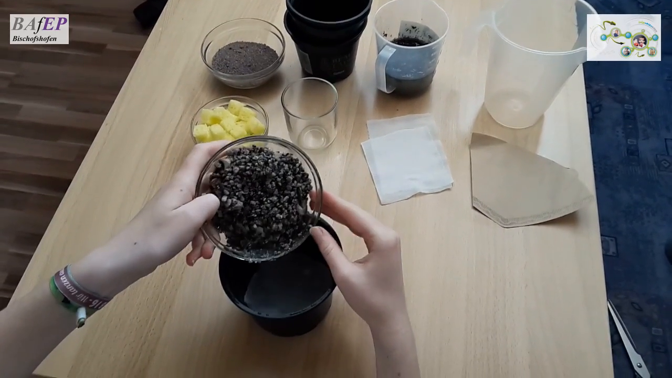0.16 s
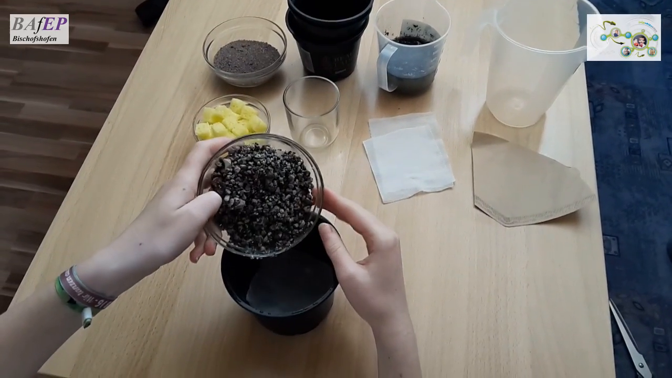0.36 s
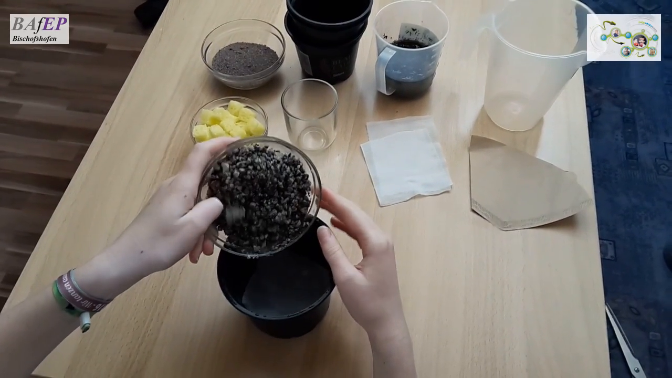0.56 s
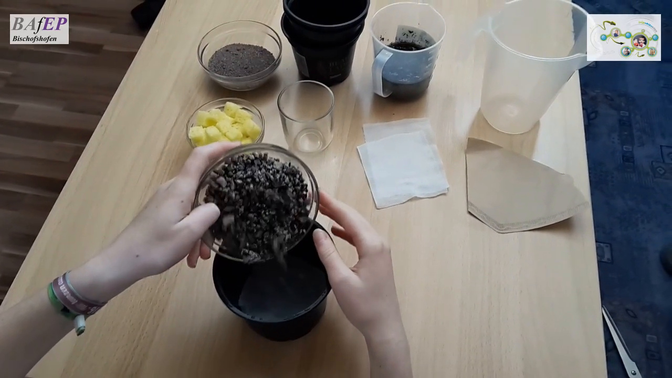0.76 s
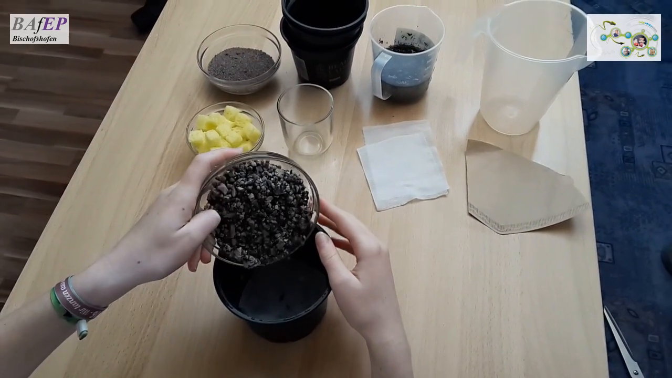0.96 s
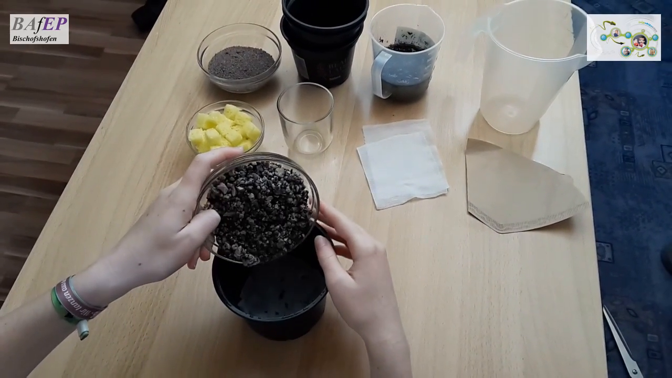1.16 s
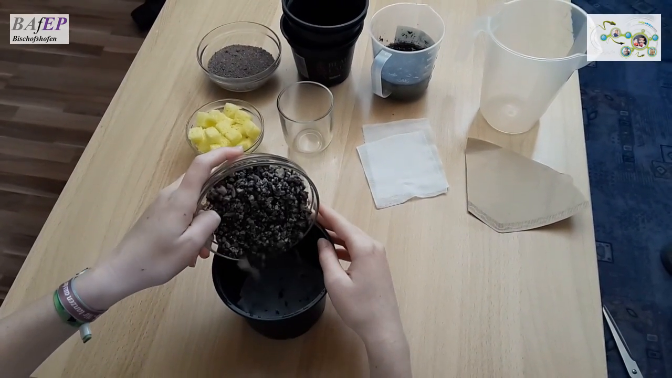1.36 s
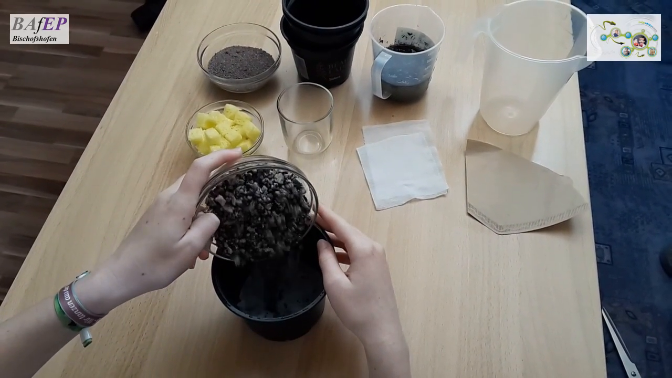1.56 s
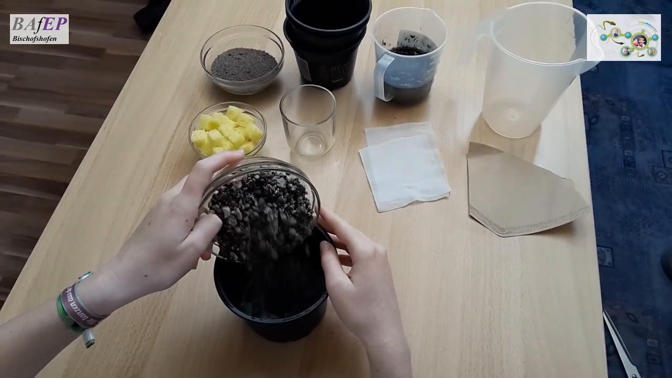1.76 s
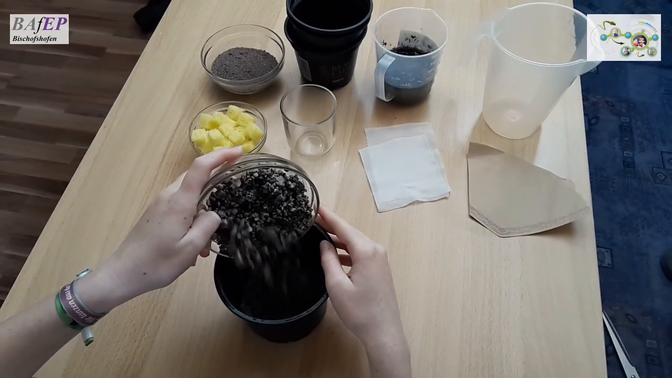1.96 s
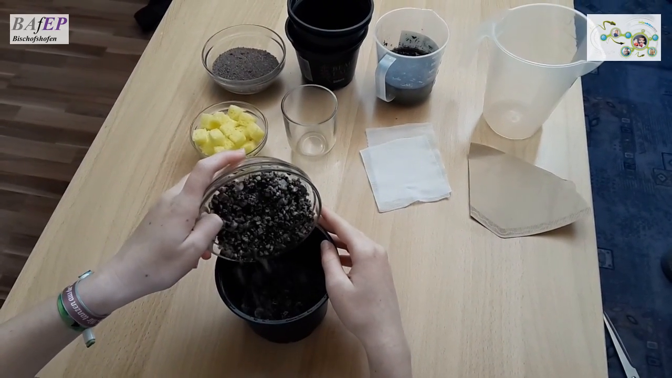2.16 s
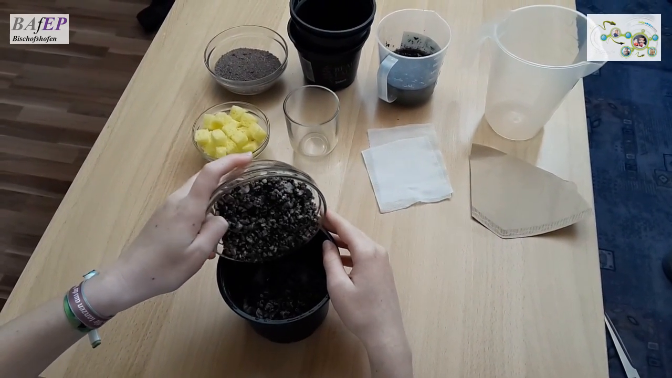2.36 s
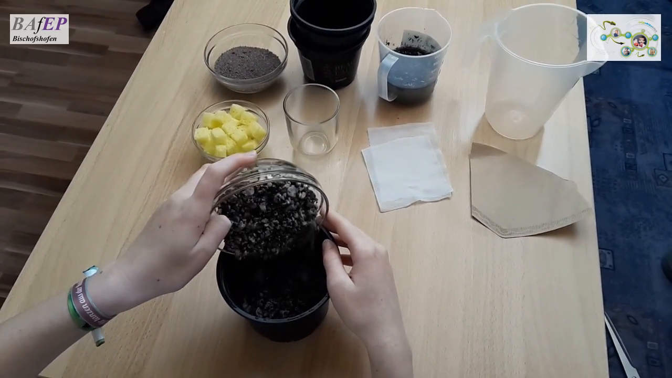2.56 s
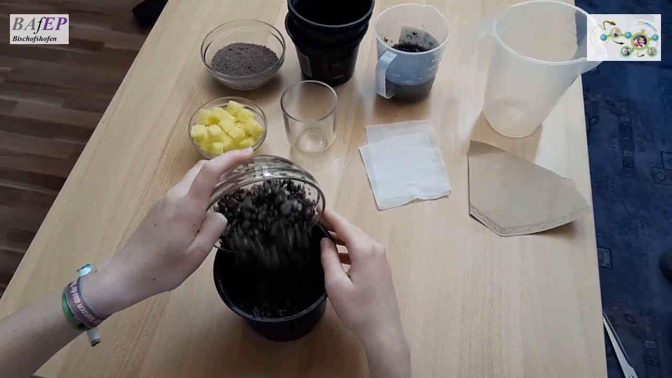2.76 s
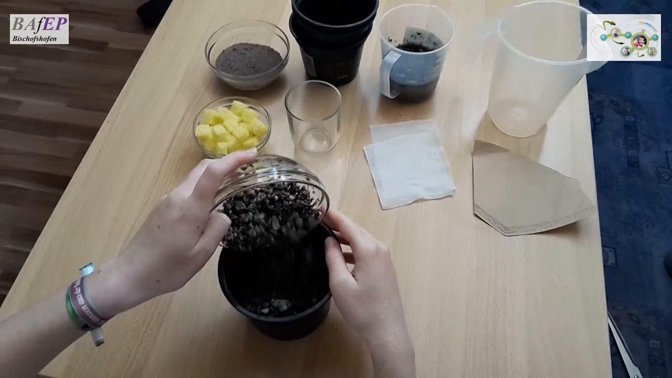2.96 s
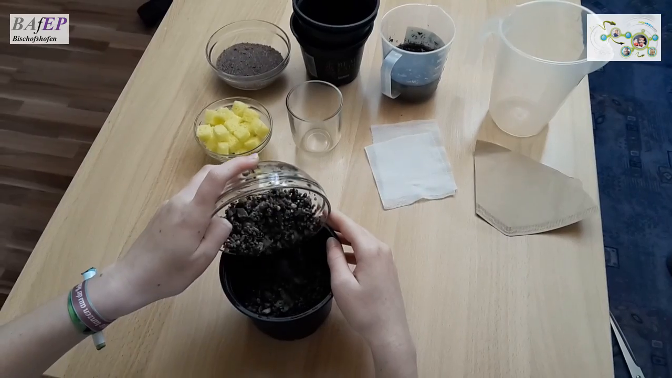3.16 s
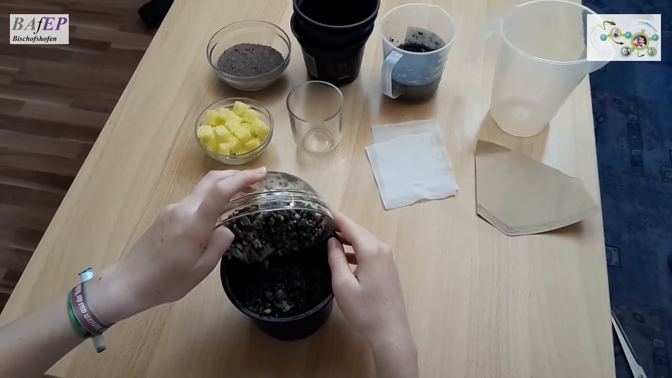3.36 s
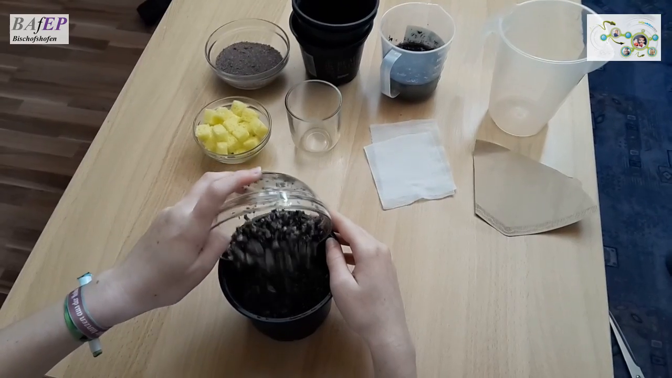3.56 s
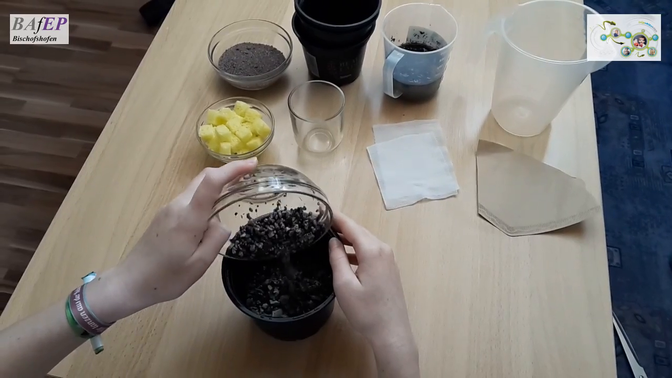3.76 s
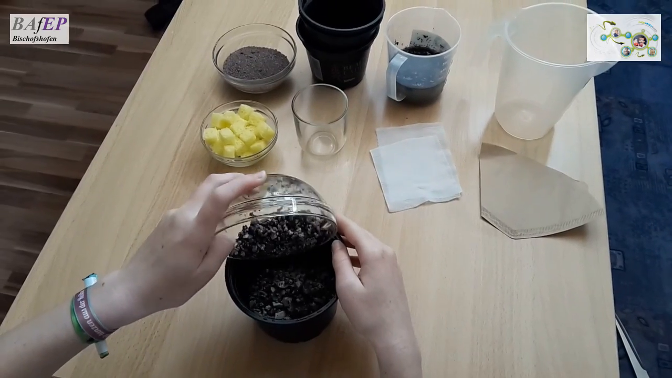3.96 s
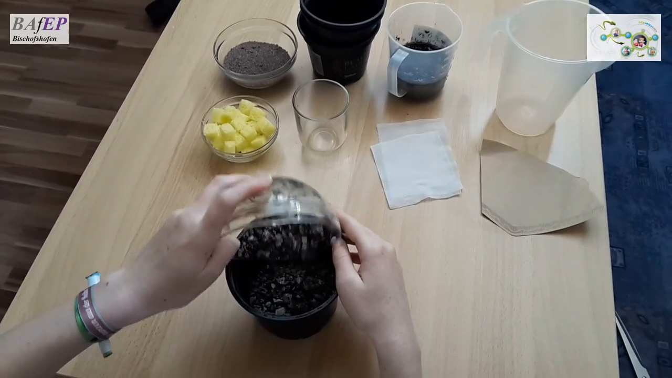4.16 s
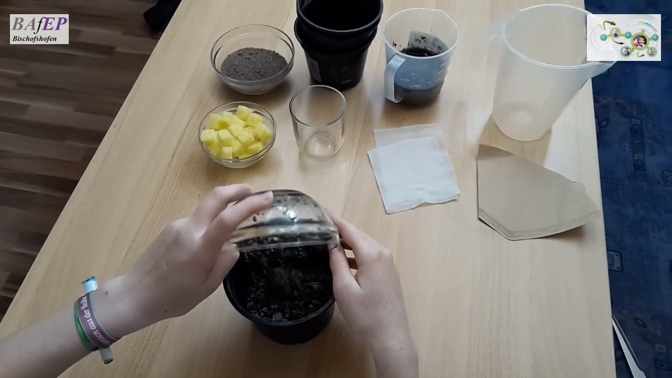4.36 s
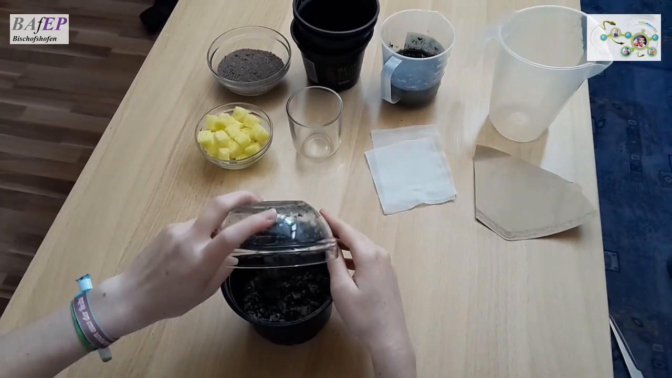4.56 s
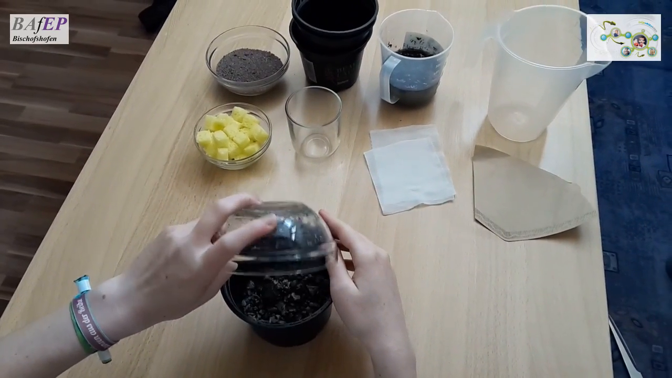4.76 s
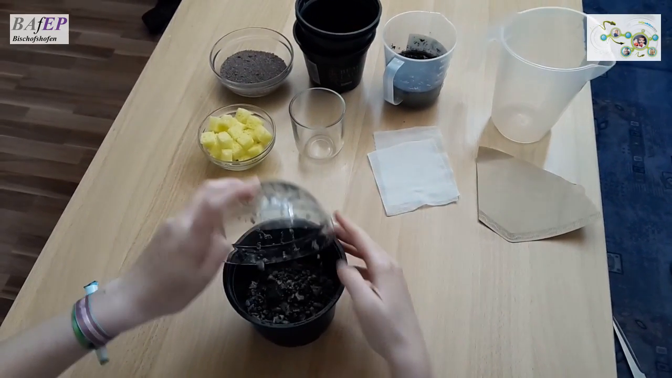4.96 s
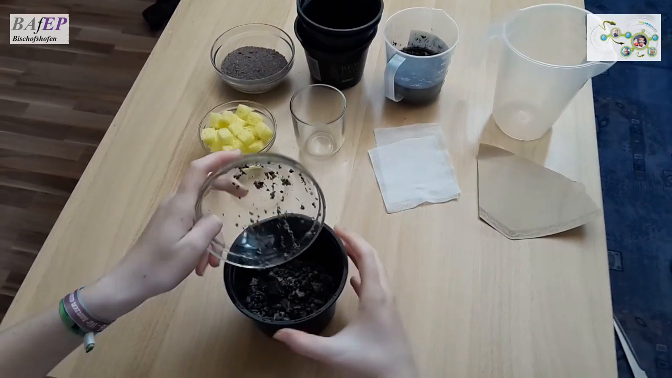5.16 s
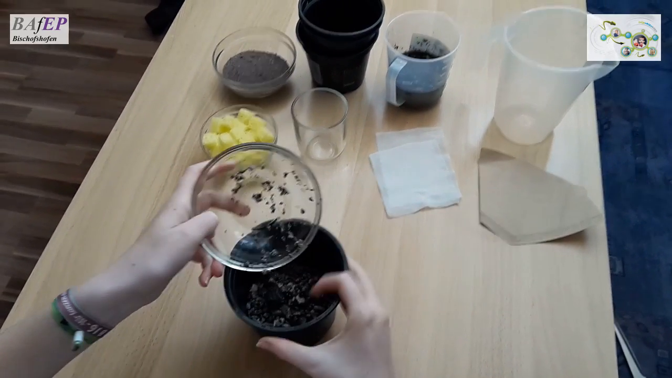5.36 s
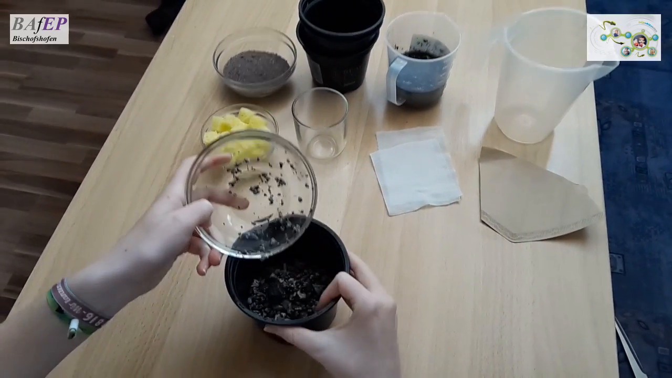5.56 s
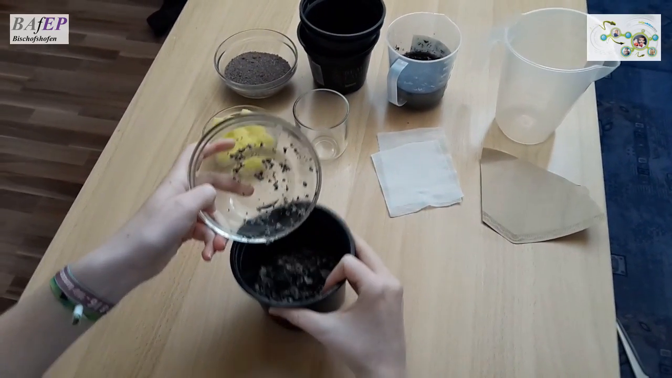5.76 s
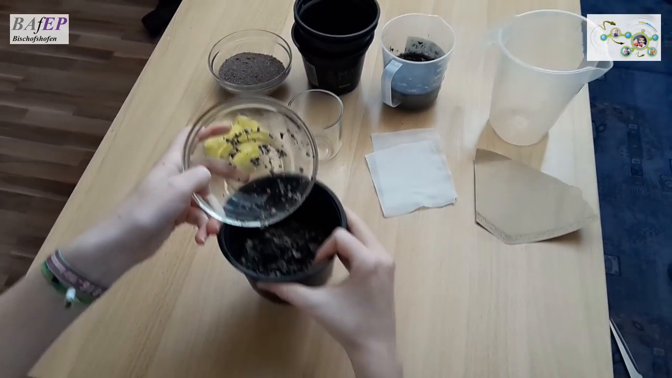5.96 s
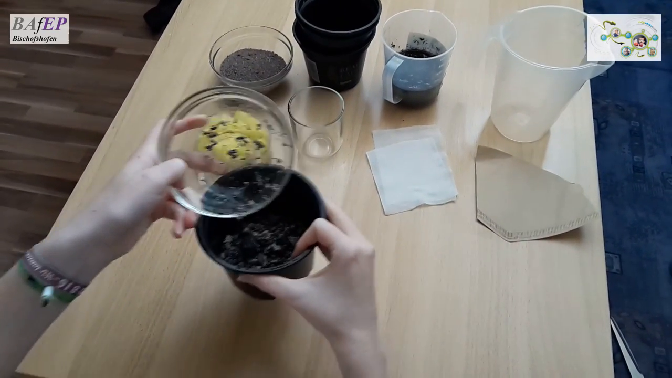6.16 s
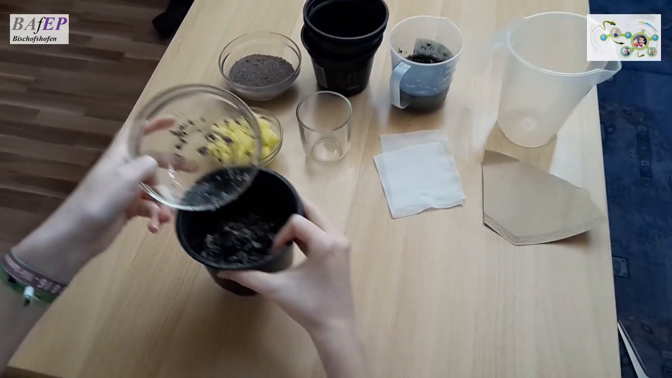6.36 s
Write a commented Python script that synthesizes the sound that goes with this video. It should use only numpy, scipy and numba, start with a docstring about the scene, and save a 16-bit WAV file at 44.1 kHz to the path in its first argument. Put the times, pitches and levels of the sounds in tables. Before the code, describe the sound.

In a small indoor room, heard close in stereo, the opening is nearly quiet: soft hiss with a barely audible, wavering low hum. From about 0.4 s single stones tick against a glass bowl, and a tight cluster of bright clinks comes at 0.8 to 1 s. Pebbles then begin dropping into a plastic flower pot with cracks and hollow knocks. At about 1.6 s the pour swells strongly, boomy and dense until 2.3 s, then eases. A second thick rattle, drier and crisper, runs from 2.9 to 3.3 s, thins, and surges again at 3.65 to 3.9 s. Around 4.1 to 4.3 s it nearly stops. Lighter bursts from 4.4 to 5 s mix stone clatter with higher, longer glass rings. A few last taps and faint clinks at 5.2 to 5.4 s follow, with short room reflections, leaving quiet hiss to the end.

```python
"""A bare room with a table: small gravel is tipped in surges from a glass bowl into a plastic flower pot.
Sliding stones clink on the glass, each click ringing a set of modes that grow higher and longer as it empties.
Stones crack and boom in the pot and on the growing heap, each landing ringing a comb of short resonances.
The room answers with a short noise wash; a steady hiss and a low wavering hum lie underneath."""
import sys
import numpy as np
from scipy import signal
from scipy.fft import rfft, irfft, next_fast_len
from scipy.io import wavfile
from scipy.ndimage import uniform_filter1d
from numba import njit

SR = 44100
rng = np.random.default_rng(int(sys.argv[2]) if len(sys.argv) > 2 else 0)


def field_ratio(decibels):
    """Amplitude ratio for a level in dB (20 dB per decade); scalars and array-likes work."""
    return 10 ** (np.asarray(decibels, dtype=float) / 20)


def persist_wave(psi):
    """Save psi, clipped to +-1, as 16-bit WAV."""
    counts = np.round(np.clip(psi, -1, 1) * 32767).astype(np.int16)
    wavfile.write(sys.argv[1], SR, np.atleast_2d(counts).T)


N = 282592


def rms_one(x):
    """Scale to unit rms."""
    return x / np.sqrt(np.mean(x ** 2) + 1e-20)


def at_hz(points, hz):
    """Read a spectrum on a log-frequency axis."""
    points_hz, values = np.transpose(points)
    return np.interp(np.log(hz), np.log(points_hz), values)


def band(x, hz, width_hz):
    """One two-pole resonance of gain 1 at its peak."""
    radius, angle = np.exp(-np.pi * width_hz / SR), 2 * np.pi * hz / SR
    top = np.array([1, 0, -1]) * (1 - radius ** 2) / 2
    return signal.lfilter(top, [1, -2 * radius * np.cos(angle), radius ** 2], x)


@njit
def ring(clicks, hz, t60, sr):
    """A unit click sets a decaying sine of height 1 ringing; pitch and decay may move."""
    out = np.zeros(len(clicks))
    for i in range(2, len(clicks)):
        if i % 64 == 2:   # renew the pitch and decay every 64 samples
            radius = 10 ** (-3 / (t60[i] * sr))
            angle = 2 * np.pi * hz[i] / sr
            a, b, c = 2 * radius * np.cos(angle), radius * radius, np.sin(angle)
        out[i] = a * out[i - 1] - b * out[i - 2] + c * clicks[i - 1]
    return out


def diffuse_bands(count):
    """Half-octave bands of stereo noise, alike in the bass and partly opposed in the treble."""
    # left-right likeness of diffuse sound: pitch_hz, correlation (-1 to 1)
    likeness = [(60, 0.45), (180, 0.63), (550, 0.34), (1650, 0.28), (4970, -0.29), (15000, -0.71)]
    borders_hz = 30 * 2 ** np.arange(0, 9.3, .5)
    white = rng.standard_normal((2, 2, count))
    for k, (low_hz, high_hz) in enumerate(zip(borders_hz, borders_hz[1:])):
        sos = signal.butter(2, [low_hz, high_hz], "band", fs=SR, output="sos")
        mid, side = signal.sosfilt(sos, white[k % 2])   # neighbouring bands use separate noise
        hz = np.sqrt(low_hz * high_hz)
        alike = np.clip(at_hz(likeness, hz), -1, 1)
        yield hz, np.sqrt(1 + alike) * mid + np.sqrt(1 - alike) * side * [[1], [-1]]


def shower(per_s, spread_db):
    """Random contacts with a few harder than the rest; returns places (samples) and sizes."""
    at = np.flatnonzero(rng.random(N - 999) < per_s / SR)
    sizes = field_ratio(spread_db * np.minimum(rng.exponential(1, N), 3)) * rng.choice([-1, 1], N)
    return at, rms_one(sizes)[at] / np.sqrt(per_s / SR)


def placed(x, lag_s, pan_db=0):
    """The far port hears it later: the right for a positive lag; a positive pan favours the left."""
    late = np.interp(np.arange(N) - abs(lag_s) * SR, np.arange(N), x)
    pair = [x, late] if lag_s > 0 else [late, x]
    return np.array(pair) * field_ratio(np.array([[.5], [-.5]]) * pan_db)


def background():
    """Steady diffuse hiss over a low sine hum whose pitch wavers at random."""
    # hiss colour: pitch_hz, density_db (per Hz, relative)
    hiss_colour = [(25, -20.5), (45, -17), (70, -12), (145, -15.5), (263, -20.5), (560, -26.5),
                   (1370, -28.5), (2500, -33), (6000, -37), (8000, -38), (14800, -34.5), (16500, -38)]
    # hum tones: pitch_hz (before wavering), level_db (rms)
    hum_tones = [(59.5, -80.5)]
    hiss_db, waver_hz = -74, 3.5   # both rms
    hiss = rms_one(sum(noise * field_ratio(at_hz(hiss_colour, hz)) for hz, noise in diffuse_bands(count=N)))
    drift = rms_one(uniform_filter1d(rng.standard_normal(N), size=3000))
    waver = waver_hz * np.cumsum(drift) / SR
    hum = np.zeros(N)
    for hz, hum_db in hum_tones:
        turns = hz * np.arange(N) / SR + waver + rng.random()
        hum += np.sqrt(2) * field_ratio(hum_db) * np.sin(2 * np.pi * turns)
    return field_ratio(hiss_db) * hiss + hum


def room(x, count=4):
    """A wash of reflections builds up in a few ms and dies band by band; it changes as the impact spot wanders."""
    # decay of the room: pitch_hz, t60_s
    room_decay = [(200, 0.2), (700, 0.38), (2500, 0.37), (6000, 0.23), (12000, 0.22)]
    t = np.arange(SR // 2) / SR
    spot = np.cumsum(rng.random(N) < 30 / SR) % count   # about 30 moves a second
    out = np.zeros((2, N))
    for k in range(count):
        echo = sum(noise * field_ratio(-60 * t / at_hz(room_decay, hz)) for hz, noise in diffuse_bands(count=len(t)))
        echo = echo * np.clip((t - .003) / 0.0015, 0, 1)
        echo = echo / np.sqrt(np.sum(echo ** 2) / 2)
        share = np.sqrt(np.abs(uniform_filter1d(1. * (spot == k), size=200)))
        out += signal.fftconvolve((share * x.mean(axis=0))[None], echo, axes=1)[:, :N]
    return out


def swells(rows, ebb_db_per_s):
    """Power of each row over time: it swells, holds and ebbs, straight in dB."""
    swell_db = 29.5   # rise within the swell time
    t = np.arange(N) / SR
    full_s, swell_s, hold_s, top_db = np.transpose(rows)[:4, :, None]
    rise_db = swell_db * np.maximum(full_s - t, 0) / swell_s
    ebb_db = ebb_db_per_s * np.maximum(t - full_s - hold_s, 0)
    return field_ratio(2 * (top_db - rise_db - ebb_db)) + 1e-30


def flow():
    """Rattle strength of all surges together in dB, and their boom in dB averaged by power."""
    # surges of small stones into the pot: full_s, swell_s, hold_s, rattle_db (relative strength),
    # boom_db (against the rattle)
    surges = [(0.271, 0.12, 0.072, -65.5, 9), (0.493, 0.25, 0.21, -68.5, -4.5),
              (0.731, 0.034, 0.02, -65.5, 9), (.83, 0.12, 0.12, -56.5, -17), (1.15, 0.51, 0.032, -50, 10),
              (1.382, 0.038, 0.28, -60, 5), (1.641, 0.028, 0.0039, -38, 17), (1.797, 0.057, 0.22, -39, 1),
              (2.205, 1, 0.12, -39.5, -4.5), (2.877, 0.18, 0.24, -41.5, 2.5),
              (3.093, 0.78, 0.19, -37.5, -4.5), (3.494, 0.16, 0.14, -49.5, -2),
              (3.67, 0.15, 0.19, -33.5, -7), (4.283, 0.58, .08, -76.5, 10), (4.497, 0.13, 0.25, -43.5, -7),
              (4.784, 0.48, 0.034, -43.5, -1.5), (4.99, .05, .01, -67, 9), (5.244, 0.099, 0.012, -65, -2),
              (5.6, .2, 0.22, -79, -1)]
    power = swells(surges, ebb_db_per_s=120.0)
    total = power.sum(axis=0)
    boom_db = np.transpose(surges)[4]
    return 10 * np.log10(total), boom_db @ power / total


def bowl():
    """Every stone strikes all glass modes with strengths of its own; the emptier bowl rings higher and longer."""
    # single stones on the glass: start_s, strength_db (relative), middle_db and lowest_db (modes against the high)
    glass_hits = [(0.391, -41, -11, 7), (0.401, -36, -1.5, 2), (0.427, -34.5, -10, -10),
                  (0.4823, -30, -3, -6), (0.5022, -28.5, -13, -13), (0.6112, -38, -14, -9),
                  (0.6218, -30, -8.5, -7), (0.7151, -31, -6.5, 8.5), (0.8033, -35.5, -24, -12),
                  (0.816, -17.5, -9.5, -22), (0.8275, -16, 2, 0), (0.843, -16, -16, 3),
                  (0.8657, -23, -13, 0.5), (0.904, -25.5, -17, -9), (0.971, -20.5, -5, -22),
                  (4.3153, -28, -9, -1), (4.412, -33, -4, 3), (4.4358, -34.5, -2, 9.5),
                  (4.4688, -25.5, -26, -18), (4.488, -22, -6.5, -1.5), (4.521, -30.5, 8.5, 6),
                  (4.6391, -17.5, -6.5, -3.5), (5.332, -40, -10, -18), (5.3615, -37, -13, -23),
                  (5.3803, -34, -8, -15)]
    # slips inside the bowl with little falling out: full_s, swell_s, hold_s, clink_db (relative strength)
    slips = [(.33, 0.22, 0.19, -67.5), (.85, 0.016, 0.007, -39), (2.72, .15, 0.055, -70),
             (4.22, 0.07, 0.062, -58.5), (4.45, 0.18, 0.028, -53)]
    # share of the gravel gone: time_s, share (0 to 1)
    emptying = [(0, 0), (1, 0), (3.5, .5), (5.4, 1.0), (6.5, 1.0)]
    # glass modes: full_hz, full_db and empty_db (relative levels), full_t60_s
    glass_modes = [(1150, -23.5, -10.5, 0.033), (2322, -14, -27, 0.016), (2448, -17, -17, 0.02),
                   (2810, -12.5, -26, .011), (4080, -18, -17.5, 0.017), (4270, -10, -11.5, 0.016),
                   (4950, -17.5, -18.5, 0.007), (6000, -10, -9.5, 0.0092), (6464, -3.5, -3, 0.013),
                   (8920, -21, -24, .013)]
    empty_rise, empty_ring = 0.032, 2   # share of pitch gained and times longer ring when empty
    clink_db, bare_db = -21, 13   # clinking against the flow, and its gain as the glass is bared
    lag_s = -0.00018   # the left port hears it later, each mode by its own multiple of this
    time_s, share = np.transpose(emptying)
    gone = np.interp(np.arange(N) / SR, time_s, share)
    poured = field_ratio(2 * (flow()[0] + clink_db + bare_db * gone))
    slipped = swells(slips, ebb_db_per_s=305).sum(axis=0)
    clinking_db = 10 * np.log10(poured + slipped)
    start_s, strength_db, middle_db, lowest_db = np.transpose(glass_hits)
    at, sizes = shower(per_s=1200, spread_db=2.5)
    out = np.zeros((2, N))
    for hz, full_db, empty_db, t60 in glass_modes:
        clicks = np.full(N, 1e-18)
        clicks[at] = sizes * field_ratio(clinking_db[at] - 15 + 5 * rng.standard_normal(len(at)))
        tilt_db = lowest_db if hz < 2000 else middle_db * (hz < 5000)
        hit_db = strength_db - 1.5 + tilt_db + 1.0 * rng.standard_normal(len(start_s))
        clicks[np.round(start_s * SR).astype(int)] += field_ratio(hit_db)
        mode = ring(clicks, hz * (1 + empty_rise * gone), t60 * empty_ring ** gone, SR)
        mode = band(mode, hz * 1.015, 630)   # the contact takes a moment: the ring swells in
        mode = mode * field_ratio(full_db + (empty_db - full_db) * gone)
        out += placed(mode, lag_s * rng.uniform(0, 2.95), pan_db=-1.0)
    # the bare tick of stone on glass: short grit on the clicks of the last mode
    grit = rng.standard_normal((2, 130)) * np.exp(-np.arange(130) / 30)
    ticks = signal.oaconvolve(clicks[None], grit, axes=1)[:, :N]
    return out + field_ratio(-17.0) * band(ticks, 10500, 8000)


def pot():
    """Each landing shakes a comb of short wall and stone rings; some stones boom more, each has a loudest ring."""
    # single stones landing: start_s (before skidding), strength_db (relative), boom_db (against the crack),
    # loudest_hz
    landings = [(1.016, -21.5, -1.5, 1220), (1.0576, -19, -5, 3840), (1.0733, -19.5, -4.5, 4270),
                (1.1193, -20.5, 11.5, 1400), (1.1783, -20.5, 1, 5400), (1.1821, -17.5, -9, 4520),
                (1.269, -21, -5.5, 5600), (1.4075, -29, 14, 714), (1.4716, -40, 0, 4170),
                (1.488, -26, -3, 6300), (1.57, -29.5, -9, 4200), (1.6337, -13.5, 9, 4080),
                (1.6713, -23, 10.5, 2030), (1.6874, -14, 4, 2200), (1.7071, -26, 5.5, 2470),
                (1.7868, -11.5, 2.5, 6400), (1.815, -17, 2.5, 3940), (1.8517, -16, 3.5, 1580),
                (1.8751, -24.5, 4, 1620), (1.9105, -10.5, 0.5, 1550), (1.9641, -25.5, 14.5, 2280),
                (2.0101, -18.5, 1, 5400), (2.081, -24, 14.5, 1590), (2.149, -17.5, -5, 5740),
                (2.1959, -21, -9, 5940), (2.2338, -20, -13, 5860), (2.2756, -21, 6, 4200),
                (2.3043, -23, -6, 3600), (2.3911, -30.5, 14.5, 5400), (2.452, -31, -9, 7800),
                (2.6867, -35, 2, 3760), (2.7783, -35, 19, 2600), (2.8694, -20.5, -4.5, 3730),
                (2.9253, -26.5, 7.5, 1500), (2.9624, -19.5, -15.5, 4500), (2.9829, -16.5, -13, 4820),
                (3.0256, -22.5, -11, 5530), (3.081, -17, -11, 5000), (3.0893, -16, -6, 5300),
                (3.1014, -19.5, -8.5, 4330), (3.1134, -20, -6.5, 5100), (3.1857, -20.5, 4, 4900),
                (3.2211, -26, 6, 2610), (3.3468, -25.5, -22, 4850), (3.3918, -29, -15, 5500),
                (3.4298, -28, -5.5, 5260), (3.4553, -21, -10.5, 5230), (3.5821, -35, 10.5, 1170),
                (3.6402, -32, -5.5, 6200), (3.6561, -20, 2.5, 5560), (3.7294, -28.5, 0, 5030),
                (3.7645, -12.5, -5.5, 4800), (3.7968, -18.5, -8.5, 4750), (3.8054, -17.5, -1.5, 3890),
                (3.8258, -19, 0, 6030), (3.8349, -14, 1, 6200), (3.9397, -18, -3, 4960),
                (4.0725, -26.5, -6.5, 5860), (4.433, -39.5, 7, 1060), (4.5685, -29, -14, 4280),
                (4.71, -29, 9, 710), (4.7195, -20, -5.5, 4670), (4.7525, -23.5, -13, 4500),
                (4.7823, -21, 0, 1210), (4.8281, -27.5, -8, 4300), (4.848, -29, 9, 750),
                (4.879, -26, -2, 1220), (4.9837, -29, -1, 4700), (5.006, -33, 4.5, 1230),
                (5.1875, -56.5, -5, 6000), (5.237, -33.5, -5.5, 1550), (5.2847, -38.5, -7, 2550)]
    # colour of stone on pot: pitch_hz, level_db (relative)
    pot_colour = [(70, -18.5), (160, -21), (250, -17.5), (450, -17.5), (700, -8), (1500, -5.5),
                  (2500, -6.5), (4000, -5.5), (6300, -4), (7400, -13.5), (9200, -15.5), (11000, -25.5),
                  (13000, -16.5), (15500, -30)]
    lag_s = 0.0002642   # the right port hears it later
    rattle_db, surge_boom_db = flow()
    start_s, strength_db, boom_db, loudest_hz = np.transpose(landings)
    edge_db = -6.5 - 0.67 * boom_db   # the more a landing booms, the less treble edge it has
    small_at, sizes = shower(per_s=400, spread_db=5.0)
    at = np.append(small_at, np.round(start_s * SR).astype(int))
    pan_db = 1.81 + 3.29 * rng.standard_normal(len(at))   # left over right, for each landing
    out = np.zeros((2, N))
    for hz in np.geomspace(70, 15500, 40):
        deep = 1 / (1 + (hz / 1600) ** 2)   # share of the boom in this ring
        near = np.exp(-(np.log(hz / loudest_hz) / 0.082) ** 2)
        small_db = (rattle_db + surge_boom_db * deep)[small_at] - 14.0
        small = sizes * field_ratio(small_db + 4.01 * rng.standard_normal(len(sizes)))
        large_db = strength_db - 0.12 + boom_db * deep + edge_db * (hz > 7500) + 7.2 * near
        large = field_ratio(large_db + 2.1 * rng.standard_normal(len(start_s)))
        large = large * rng.choice([-1, 1], len(start_s))   # each wall ring starts inward or outward
        sizes_here = np.append(small, large)
        clicks = np.full((2, N), 1e-18)
        skid_s = rng.exponential(.0013, len(at))
        for side in (0, 1):
            # the stone skids and rebounds: rings start up to 8 ms late, differently towards each port
            rebound_s = (hz > 900) * rng.exponential(.0005, len(at))
            late = (SR * np.minimum(skid_s + rebound_s, .008)).astype(int)
            np.add.at(clicks[side], at + late, sizes_here * field_ratio(-side * pan_db))
        width_hz = hz / 8.03
        rings = band(band(clicks, hz, width_hz), hz, 2.4 * width_hz)
        out += field_ratio(at_hz(pot_colour, hz)) * rings * 14
    return np.array([out[0], placed(out[1], lag_s)[1]])


def microphone(x):
    """A treble resonance, then the unequal colours of the two ports."""
    # microphone resonance: pitch_hz, width_hz, peak_db
    capsule = (6300, 570, 4.5)
    # the two ports hear colours unequally: pitch_hz, left_over_right_db
    port_lean = [(60, -5), (110, -1.5), (200, -1.5), (380, -4.5), (700, 0), (1290, -2.5), (2380, -0.5),
                 (4400, -1.5), (8120, -11), (15000, -2)]
    hz, width_hz, peak_db = capsule
    x = x + (field_ratio(peak_db) - 1) * band(x, hz, width_hz)
    size = next_fast_len(N)
    lean_db = at_hz(port_lean, np.arange(1, size // 2 + 2) * SR / size)
    spectrum = rfft(x, size) * field_ratio(np.array([[.5], [-.5]]) * lean_db)
    return irfft(spectrum, size)[:, :N]


def scene():
    """Bowl and pot with their room wash at the microphone, over the background."""
    glass, plastic = bowl(), pot()
    wash = room(field_ratio(2.5) * glass + field_ratio(-1.0) * plastic)
    return microphone(glass + plastic + wash) + background()


def band_limit(x):
    """A steep low-pass at the top of the band."""
    return signal.sosfilt(signal.butter(12, 16800, fs=SR, output="sos"), x)


def record(dry):
    """The converter adds its slight resting offset."""
    offset = -.0004   # of full scale
    return band_limit(dry + offset)


dry = scene()
out = record(dry)
persist_wave(out)
```